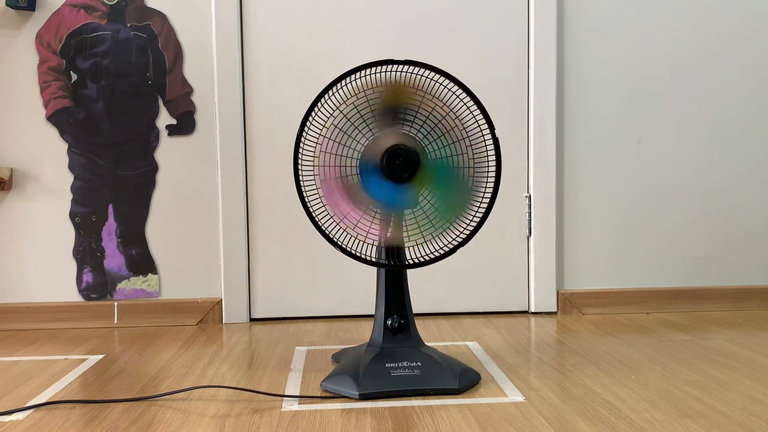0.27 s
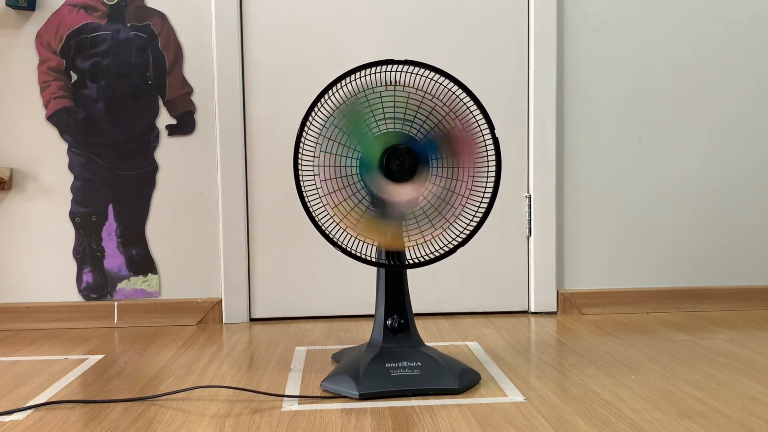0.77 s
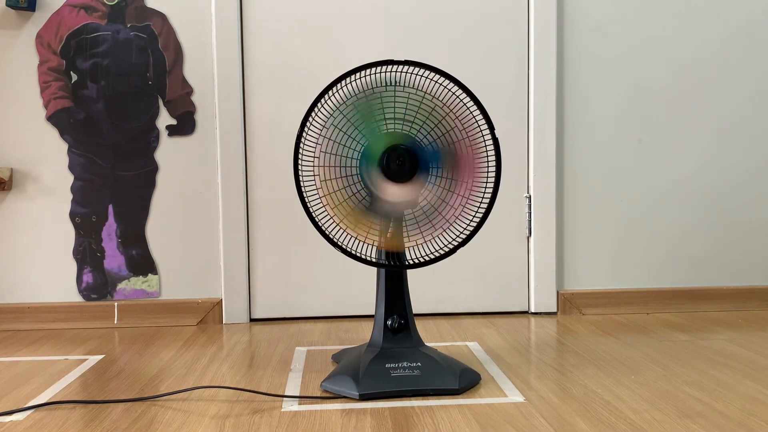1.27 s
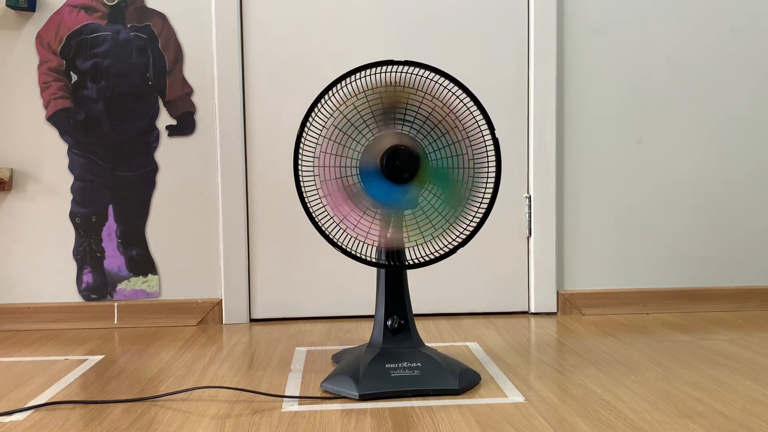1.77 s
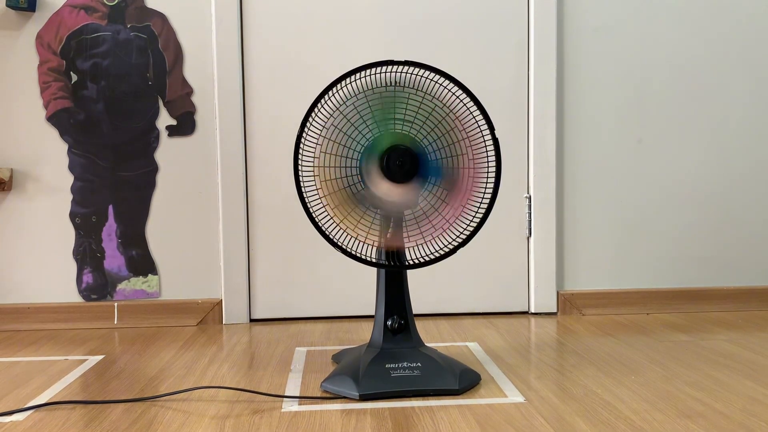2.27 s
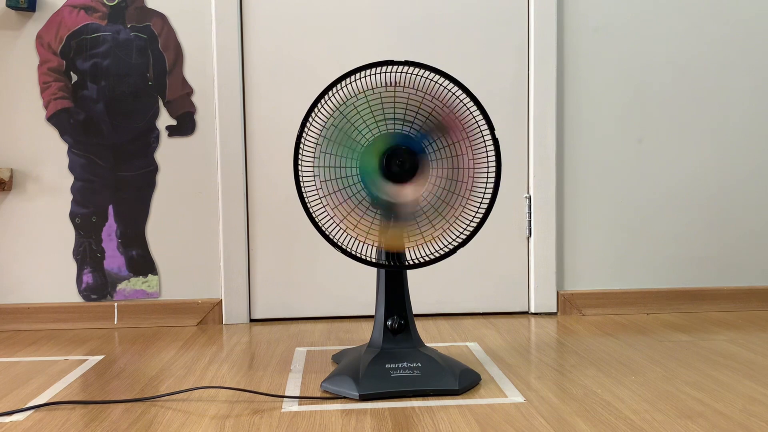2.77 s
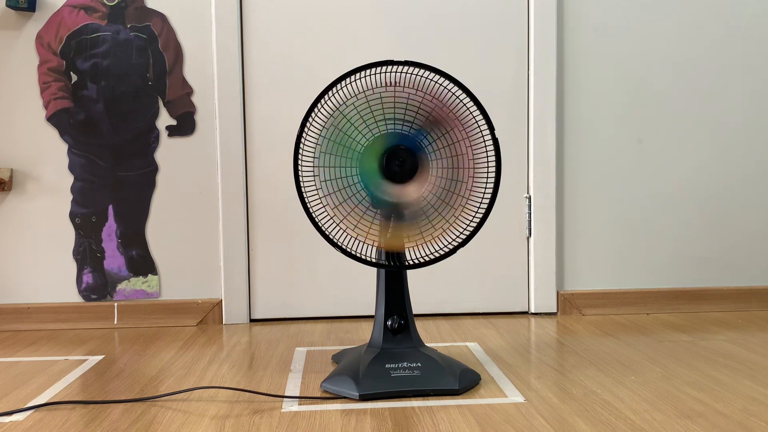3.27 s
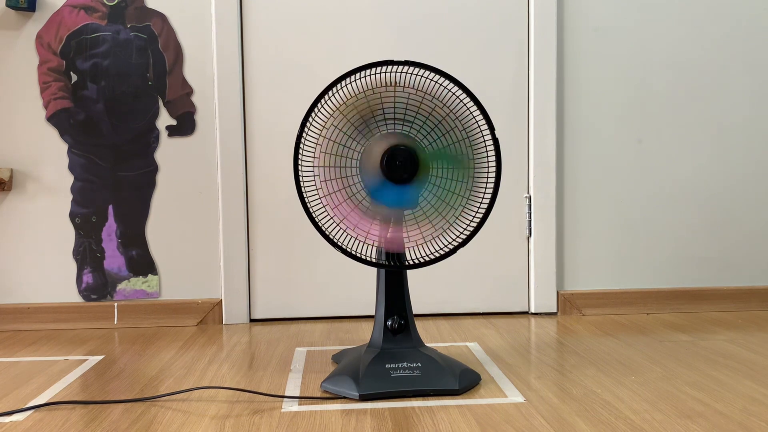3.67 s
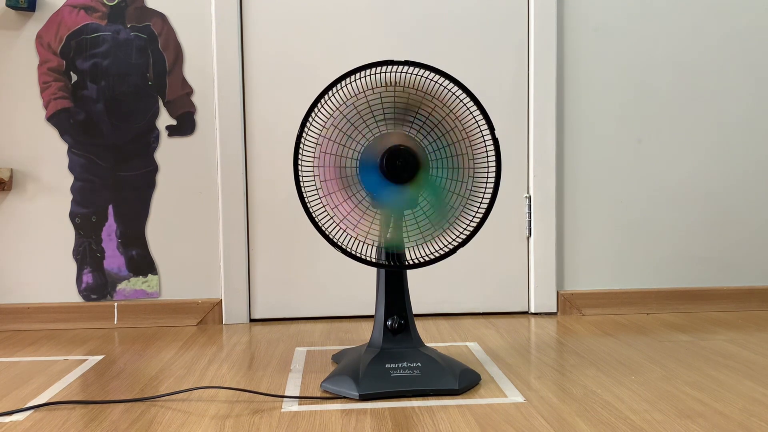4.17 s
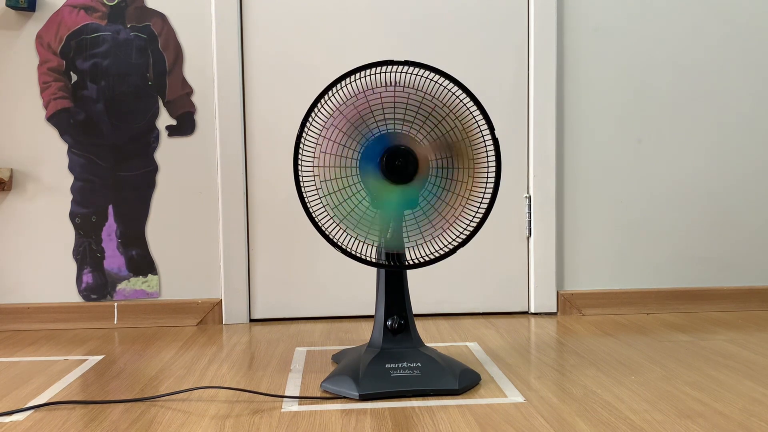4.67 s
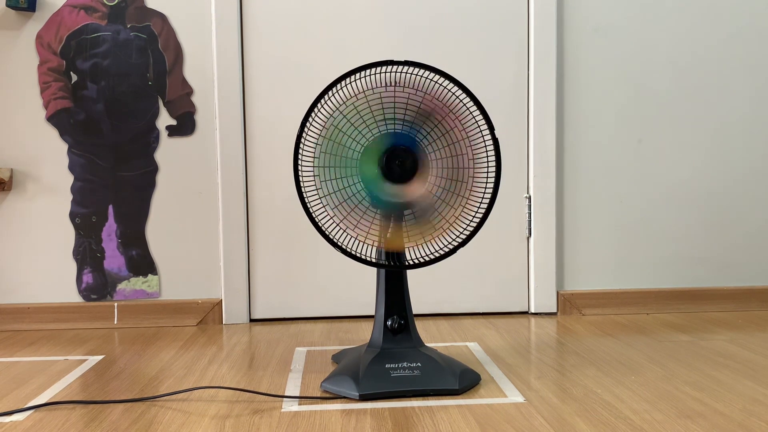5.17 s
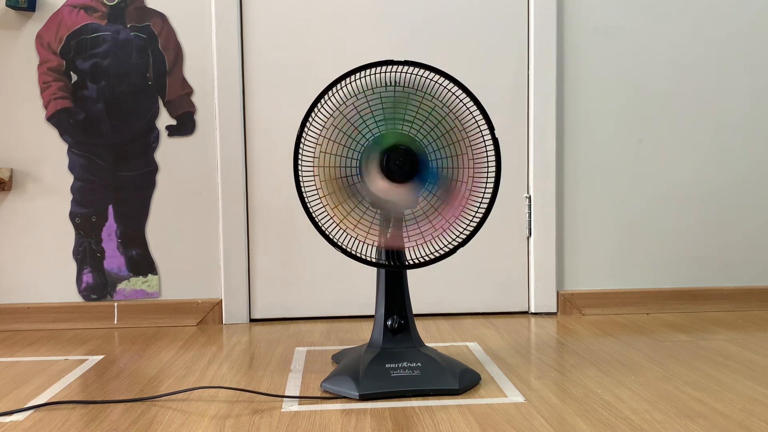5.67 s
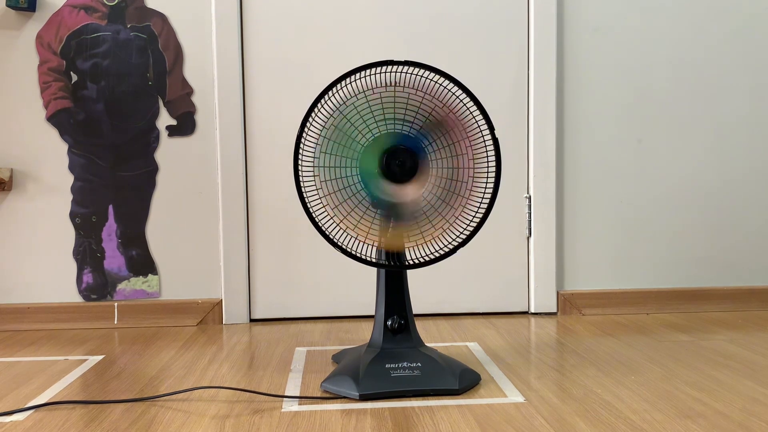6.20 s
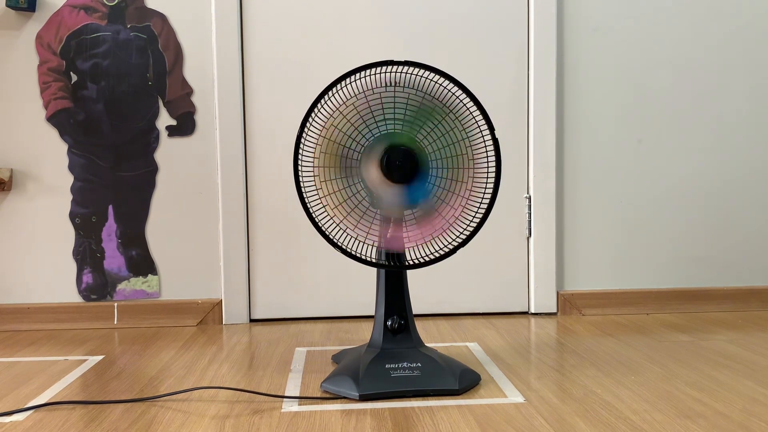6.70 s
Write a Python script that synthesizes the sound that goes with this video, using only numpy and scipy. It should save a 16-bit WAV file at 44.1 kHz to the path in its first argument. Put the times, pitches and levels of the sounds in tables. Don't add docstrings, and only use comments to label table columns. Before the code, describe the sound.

An electric fan runs on the floor of a bare room. It begins very quietly, with a faint hiss and thin motor whine. After about a second its air reaches the microphone, and uneven low rumble and soft thuds build into strong buffeting, with gusts and short lulls until the end.

```python
import sys
import numpy as np
from scipy import signal
from scipy.fft import rfft, irfft, next_fast_len
from scipy.io import wavfile
from scipy.ndimage import uniform_filter1d, minimum_filter1d

SR = 44100
rng = np.random.default_rng(int(sys.argv[2]) if len(sys.argv) > 2 else 0)


def put_to_file(sound):
    columns = np.atleast_2d(sound).T
    safe = np.clip(columns, -1, 1)
    whole_steps = np.round(safe * 32767)
    wavfile.write(sys.argv[1], SR, whole_steps.astype(np.int16))


def how_loud(loudness_db):
    steps = np.asarray(loudness_db, float) / 20
    return 10 ** steps


N = 306054

# t/s, flap peak level/dB, snap peak level/dB, kick length/ms
SHARP_EDDIES = [(1.186, -29, -39, 3.8), (2.303, -9, -26.5, 5), (2.601, -11.5, -35, 3.5),
                (2.787, -10, -31, 9.6), (2.816, -11.5, -35.5, 4.7), (3.089, -23.5, -32.5, 5.6),
                (3.263, -11, -29, 6.9), (3.488, -13.5, -37, 7.4), (3.683, -18.5, -36.5, 4.65),
                (3.85, -5.5, -10, 3.45), (3.892, -9.5, -30.5, 4.4), (4.254, -16, -31, 1.24),
                (4.278, -29, -32, 3.1), (4.386, -14, -32, 2), (4.659, -12.5, -26.5, 8.8),
                (4.678, -4, -24, 7.5), (4.698, -4.5, -27.5, 6.7), (4.992, -15.5, -45, 2.3),
                (5.189, -10, -23, 2.24), (5.275, -9, -29, 2.8), (5.335, -9.5, -25.5, 1.9),
                (6.078, -7, -28.5, 2.56), (6.262, -13.5, -18.5, 7.8), (6.283, -2, -18.5, 2.5),
                (6.311, -9.5, -25, 6.2), (6.605, -10, -28.5, 6.1), (6.62, -13, -27, 5.5),
                (6.665, -10.5, -32, 5.8), (6.733, -7.5, -24.5, 9.3), (6.862, -14.5, -14.5, 3.75)]
# t/s, flap peak level/dB, swell level/dB
SOFT_EDDIES = [(1, -27, -29.5), (1.043, -31, -20.5), (1.375, -24, -25), (1.444, -24.5, -23),
               (1.542, -30, -15.5), (1.703, -29.5, -17.5), (1.826, -21, -14), (1.998, -17, -17),
               (2.209, -17, -20.5), (2.511, -19, -18.5), (2.569, -20, -29.5), (2.659, -23.5, -18.5),
               (2.891, -17.5, -27), (3.21, -13, -17.5), (3.989, -20, -16), (4.328, -18.5, -33),
               (4.496, -24, -16), (4.592, -14, -14), (4.772, -16, -28), (4.934, -17.5, -15),
               (5.136, -19, -16.5), (5.218, -18.5, -18.5), (5.503, -29, -19.5), (5.711, -9.5, -19),
               (5.804, -20, -20), (5.911, -16.5, -24), (6.057, -7.5, -17), (6.222, -13.5, -13.5),
               (6.759, -17, -31), (6.914, -21, -31)]
# t/s, flap peak level/dB, snap peak level/dB
FAINT_EDDIES = [(1.226, -27.5, -39.5), (1.778, -32, -74), (1.922, -27, -75), (2.152, -30, -74),
                (2.285, -22, -41.5), (2.408, -22, -77), (3.159, -21.5, -67), (3.322, -45, -46),
                (3.412, -31, -72), (3.517, -20, -38), (3.729, -26, -39), (3.787, -27.5, -53),
                (4.212, -23.5, -41), (4.719, -20, -34), (4.849, -25.5, -60), (5.379, -25.5, -49),
                (5.74, -23, -50), (6.003, -15, -56), (6.167, -14, -37), (6.348, -25, -39),
                (6.561, -23, -36)]
SWEEP_CYCLES = 1.3


def rms_one(x):
    return x / np.sqrt(np.mean(x ** 2) + 1e-20)


def in_time(rows):
    s, *columns = np.transpose(rows)
    now = np.arange(N) / SR
    return [uniform_filter1d(np.interp(now, s, c), size=300, mode="nearest") for c in columns]


def response(points, length, cycles=0.0):
    hz = np.maximum(np.arange(length // 2 + 1) * SR / length, 10)
    at, level_db = np.transpose(points)
    gain = how_loud(np.interp(np.log(hz), np.log(at), level_db))
    return gain * np.exp(-2j * np.pi * cycles * np.log(hz))


def colour(x, points, cycles=0.0):
    length = next_fast_len(N + SR)
    spectrum = rfft(x, length) * response(points, length, cycles)
    return rms_one(irfft(spectrum, length)[:N])


def drift(rate):
    r = np.exp(-80 * np.pi * rate / SR)
    noise = rng.standard_normal(N // 40 + 2002)
    slow = signal.lfilter([1], [1, -2 * r, r * r], noise)[2000:]
    return np.interp(np.arange(N) / 40, np.arange(len(slow)), rms_one(slow))


def narrow(hz, width_hz):
    r = np.exp(-np.pi * width_hz / SR)
    poles = [1, -2 * r * np.cos(2 * np.pi * hz / SR), r * r]
    once = signal.lfilter([1, 0, -1], poles, rng.standard_normal(N))
    return rms_one(signal.lfilter([1], poles, once))


def self_noise():
    # f/Hz, level/dB
    floor_mid = [(200, -2), (1400, 2), (3000, -13.5), (6000, -14), (8200, -20), (8400, -27), (8900, -24),
                 (9100, -21.5), (11000, -17), (12400, -22), (12850, -36), (12950, -78)]
    # f/Hz, level/dB
    floor_side = [(300, 1), (1400, -2.5), (2500, -15.5), (7600, -20.5), (8000, -17.5), (10200, -22.5),
                  (10400, -65.5), (11600, -57.5), (11800, -23), (13700, -24), (14400, -30.5)]
    mid = how_loud(-60) * colour(rng.standard_normal(N), floor_mid)
    side = how_loud(-59) * colour(rng.standard_normal(N), floor_side)
    return mid, side


def blades(points, hiss_db):
    air, together = colour(rng.standard_normal(N), points), drift(3.2)
    spectrum = rfft(air)
    octave = np.log2(np.arange(1, N // 2 + 2) * SR / N / 100)
    depth = 1 + np.clip(-55.5 - hiss_db, 0, 9) * 0.2
    out = 0
    for centre in np.arange(0, 7.5, .5):
        weight = np.clip(1 - 2 * np.abs(octave - centre), 0, 1)
        band = irfft(spectrum * weight, N)
        swell_db = 1.4 * together + 1.0 * drift(15) + 2.0 * drift(12)
        out = out + band * how_loud(depth * swell_db)
    return out


def motor():
    # f/Hz, width/Hz, level/dB
    whines = [(1287, 24, -69), (1723, 18, -73), (1789, 50, -75), (2602, 40, -82)]
    return sum(how_loud(level_db) * narrow(hz, width_hz) for hz, width_hz, level_db in whines)


def squeaks():
    # t/s, f/Hz, width/Hz, length/s, level/dB
    squeak_events = [
        (.0, 5680, 400, 0.046, -68),
        (.86, 710, 60, 0.068, -57),
        (4.11, 5120, 450, .07, -68),
        (6.07, 8260, 200, 0.07, -75.5),
        (6.07, 6350, 200, .06, -71),
        (6.74, 1730, 60, 0.13, -53.5),
    ]
    now = np.arange(N) / SR
    out = np.zeros(N)
    for s, hz, width_hz, length, level_db in squeak_events:
        arch = np.sin(np.pi * np.clip((now - s) / length, 0, 1))
        out += how_loud(level_db) * narrow(hz, width_hz) * arch
    return out


def swelling(steady, rows):
    fall_db, rise_share = 18.5, 0.73
    now = np.arange(N // 40 + 1) * 40 / SR
    s, top_db, length = np.transpose(rows)[:, :, None]
    away = np.maximum((now - s) / length, (s - now) / (rise_share * length))
    swells = np.sum(how_loud(top_db - fall_db * away) ** 2, axis=0)
    power = how_loud(np.interp(now, *np.transpose(steady))) ** 2 + swells
    return in_time(np.transpose([now, 10 * np.log10(power)]))[0]


def stream():
    # t/s, level/dB
    steady_flow = [(0, -44), (.44, -49), (.7, -46), (.94, -44.5), (1.0, -32.5), (1.4, -33.5), (2.1, -28.5),
                   (2.5, -29), (3.0, -25), (3.25, -22.5), (3.46, -27.5), (4.1, -29.5), (4.5, -23.5),
                   (4.85, -20), (5.2, -26.5), (5.6, -39), (6.0, -22.5), (6.5, -32.5)]
    # t/s of the top, level/dB, length/s
    swells = [(0.062, -57, 0.032), (0.48, -37, 0.051), (1.211, -21.5, 0.065), (1.485, -14, 0.019),
              (2.143, -20, 0.036), (2.317, -15, .04), (2.388, -25.5, 0.093), (2.617, -13.5, 0.074),
              (2.804, -6.5, 0.06), (2.957, -13, 0.038), (3.56, -15.5, 0.087), (3.747, -22, 0.23),
              (3.918, -15, 0.052), (4.01, -15, .07), (4.177, -20, 0.039), (4.29, -21, 0.057),
              (4.566, -18.5, 0.093), (4.71, -17, 0.049), (5.015, -4.5, 0.017), (5.118, -12.5, 0.053),
              (5.291, -10, .04), (5.36, -19.5, 0.025), (5.438, -14.5, 0.054), (5.652, -21, 0.027),
              (6.306, -12, 0.12), (6.4, -10, 0.014), (6.601, -11.5, 0.071), (6.645, -14.5, .05),
              (6.752, -8, 0.032), (6.94, -14.5, 0.062)]
    drag_lag_s, drag_s, lead_s, halo_lag_s, halo_s = 0.019, 0.067, 0.018, .002, 0.062
    dragged = [(s + drag_lag_s, db, drag_s) for s, _, db in SOFT_EDDIES]
    flow_db = swelling(steady_flow, swells + dragged)
    ahead_db = np.interp(np.arange(N) + lead_s * SR, np.arange(N), flow_db)
    flutter_db = -39 + 0.81 * (ahead_db + 25.5)
    halos = [(row[0] + halo_lag_s, min(row[2] - 7, -32), halo_s) for row in SHARP_EDDIES + FAINT_EDDIES]
    rasp_db = swelling([(0, -56.5)], halos)
    return flow_db, flutter_db, rasp_db


def evened(x, share):
    swell = np.sqrt(uniform_filter1d(uniform_filter1d(x ** 2, size=1500), size=1500) + .02)
    return rms_one(x / swell ** share)


def buffeting(rumble_db, flutter_db, rasp_db):
    # f/Hz, level/dB
    rumble_colour = [(20, -35), (33, -14.5), (58, 2.5), (85, -5), (110, -8), (150, -35.5), (300, -62),
                     (1000, -130)]
    # f/Hz, level/dB
    flutter_colour = [(60, -37), (100, -1.5), (130, 4.5), (200, -6), (300, -22.5), (450, -29.5),
                      (800, -64.5), (3000, -130)]
    # f/Hz, level/dB
    rasp_colour = [(200, -7.5), (290, -2.5), (400, 0), (600, -16.5), (900, -33.5), (1500, -64),
                   (4000, -120)]

    def lumpy(lumps_db, points):
        return colour(rng.standard_normal(N) * how_loud(lumps_db), points, SWEEP_CYCLES)

    lumps = drift(26)
    rumble = evened(lumpy(1.7 * lumps, rumble_colour), share=0.6)
    thin = signal.sosfilt(signal.butter(2, 85, "high", fs=SR, output="sos"), rumble)
    arrived = np.clip(np.maximum.accumulate(rumble_db + 35.5) / 6.8, 0, 1)
    rumble = arrived * rumble + (1 - arrived) * how_loud(4.5) * thin
    flutter = lumpy(3.0 * lumps + 3.0 * drift(32), flutter_colour)
    rasp = lumpy(2.0 * lumps + 1.5 * drift(40), rasp_colour)
    return how_loud(rumble_db + 1.93) * rumble + how_loud(flutter_db + 5.0) * flutter + how_loud(rasp_db - 8.5) * rasp


def eddies(flap_gain_db, snap_gain_db):
    # f/Hz, level/dB
    flap_colour = [(25, -26), (60, 6.5), (170, 4.5), (300, -6.5), (420, -26), (800, -67.5), (3000, -130)]
    # f/Hz, level/dB
    snap_colour = [(200, -33.5), (380, 6), (600, -3.5), (1000, -23), (1800, -32), (3000, -82), (6000, -120)]
    soft_ms, length, lead = 3.75, 8192, 512
    rows = SHARP_EDDIES + [(s, db, -24 + 1.3 * db, soft_ms) for s, db, _ in SOFT_EDDIES]
    rows = rows + [(*row, soft_ms) for row in FAINT_EDDIES]
    age_ms = np.arange(1024) / SR * 1000
    fade = signal.windows.tukey(length, .1)
    flap = response(flap_colour, length, SWEEP_CYCLES)
    snap = response(snap_colour, length, SWEEP_CYCLES)
    turns = np.arange(length // 2 + 1) / length
    out = np.zeros(N + length)
    for s, flap_db, snap_db, length_ms in rows:
        noise = rng.standard_normal(1024)
        ragged = rfft(noise * age_ms ** 0.7 * np.exp(-age_ms / length_ms), length)
        ragged = ragged / np.sqrt(np.mean(np.abs(ragged) ** 2))
        push_at = 0.601 * length_ms * SR / 1000
        push = 0.89 * np.sign(noise[0]) * np.exp(-2j * np.pi * turns * push_at)
        at = round(s * SR) - lead
        for part, level_db in (flap, flap_db + flap_gain_db), (snap, snap_db + snap_gain_db):
            sweep = np.roll(irfft((ragged + push) * part, length), lead) * fade
            out[at:at + length] += how_loud(level_db) * sweep / np.abs(sweep).max()
    return out[:N]


def scene():
    # t/s, hiss level/dB
    fan_level = [(0, -74), (.5, -67.5), (.95, -60), (1.5, -58.5), (2.0, -61), (2.35, -55.5), (3.4, -53.5),
                 (3.9, -50.5), (4.62, -51), (4.67, -58.5), (4.85, -51.5), (5.17, -50), (5.21, -57),
                 (5.67, -56.5), (5.72, -51), (6.1, -50), (6.55, -50), (6.94, -49.5)]
    # f/Hz, level/dB
    hiss_mid = [(150, 4.5), (400, -5.5), (760, -4.5), (1000, -6.5), (1090, -10), (1290, -1), (1750, -5.5),
                (2050, -13.5), (3000, -13), (3500, -20.5), (5200, -26), (7000, -40.5), (9000, -57),
                (12000, -76)]
    # f/Hz, level/dB
    hiss_side = [(150, -14.5), (400, -1.5), (900, -13), (1100, -0.5), (1500, -9.5), (2100, -14.5),
                 (3000, -17.5), (4000, -23), (7000, -29.5), (9000, -45.5), (12000, -81.5)]
    hiss_db, = in_time(fan_level)
    mid, side = self_noise()
    mid += how_loud(hiss_db + 2.5) * blades(hiss_mid, hiss_db)
    side += how_loud(hiss_db - 2.5) * blades(hiss_side, hiss_db)
    mid += how_loud(hiss_db + 58.5) * motor() + squeaks()
    flow = stream()
    mid += buffeting(*flow) + eddies(flap_gain_db=-1.3, snap_gain_db=-0.9)
    side += how_loud(-6.5) * buffeting(*flow) + eddies(flap_gain_db=1.0, snap_gain_db=-6)
    return np.array([mid + 0.94 * side, mid - side]) * how_loud([[.1], [-.1]])


def wind_guard(side):
    # t/s, f/Hz
    mono_below = [(1.42, 14), (1.47, 330), (1.7, 450), (2.1, 640), (3.0, 670), (6.94, 824)]
    grid = dict(window="blackmanharris", nperseg=2048, noverlap=1792)
    hz, s, frames = signal.stft(side, SR, **grid)
    waver_db = 1.2 * np.interp(s, np.arange(N) / SR, drift(8.7))
    edge_hz = np.interp(s, *np.transpose(mono_below)) * how_loud(waver_db)
    return signal.istft(frames * (hz[:, None] >= edge_hz - 12), SR, **grid)[1][:N]


def limiter(mid, side):
    room_left = np.minimum(1, .95 / (np.abs(mid) + np.abs(side) + 1e-9))
    held = minimum_filter1d(room_left, size=1200)
    return uniform_filter1d(uniform_filter1d(held, size=600), size=600)


def low_pass(x):
    return signal.sosfilt(signal.butter(12, 14450, fs=SR, output="sos"), x)


def record(dry):
    mid, side = (dry[0] + dry[1]) / 2, (dry[0] - dry[1]) / 2
    side = wind_guard(side)
    mix = limiter(mid, side) * np.array([mid + side, mid - side])
    return low_pass(mix)


dry = scene()
out = record(dry)
put_to_file(out)
```